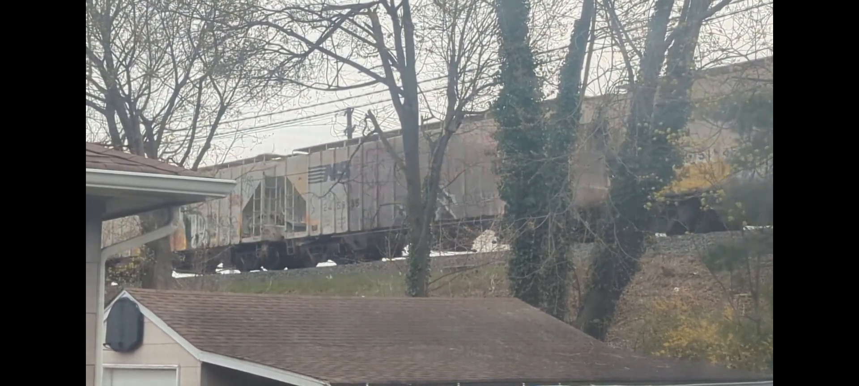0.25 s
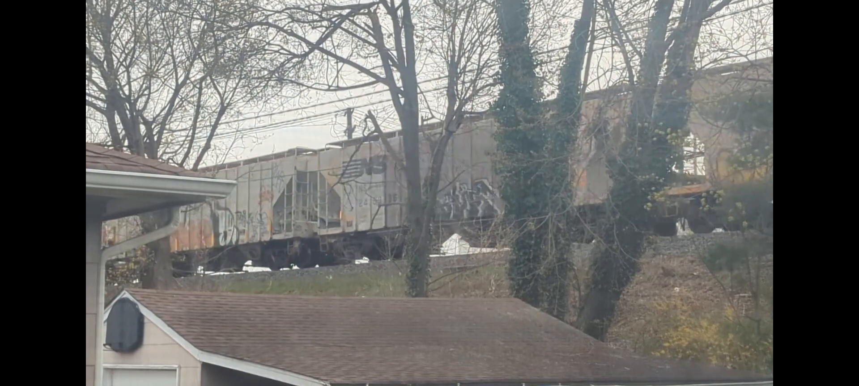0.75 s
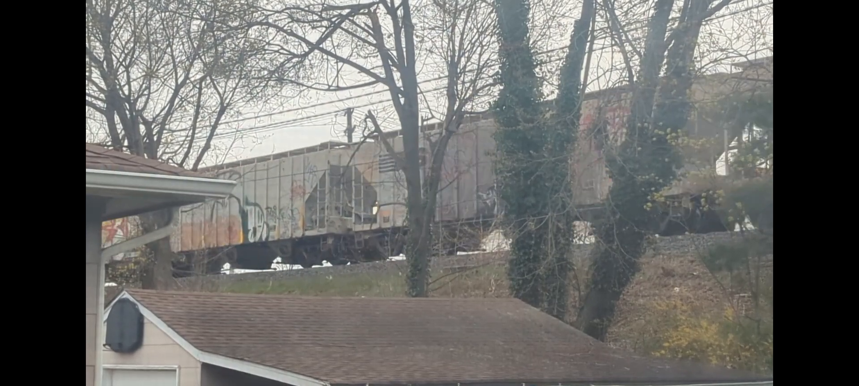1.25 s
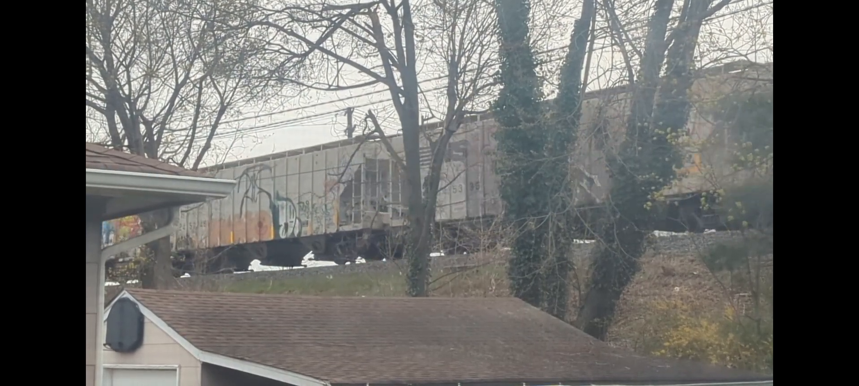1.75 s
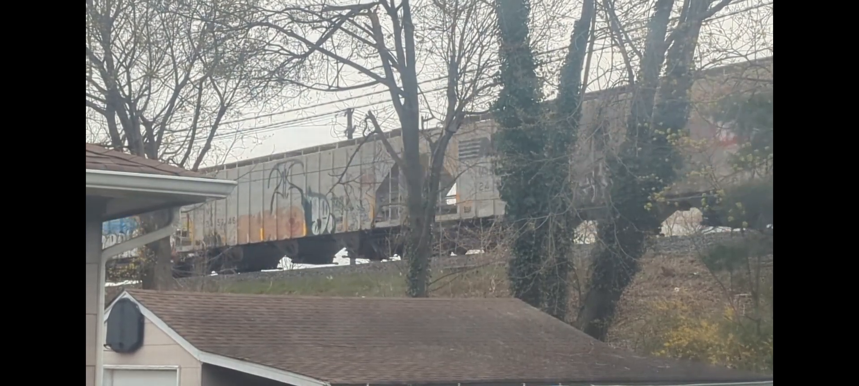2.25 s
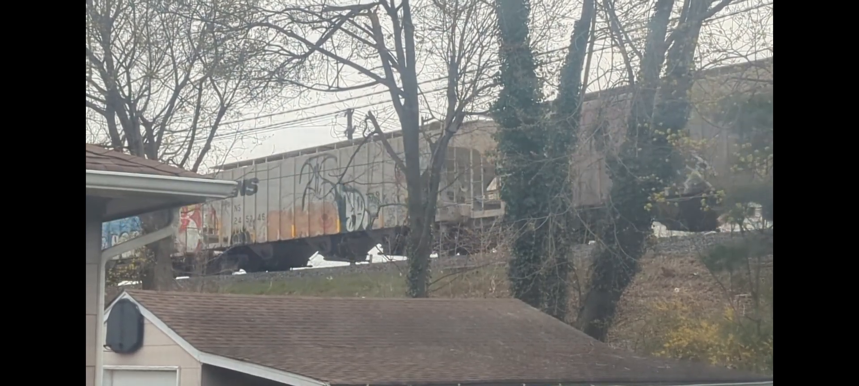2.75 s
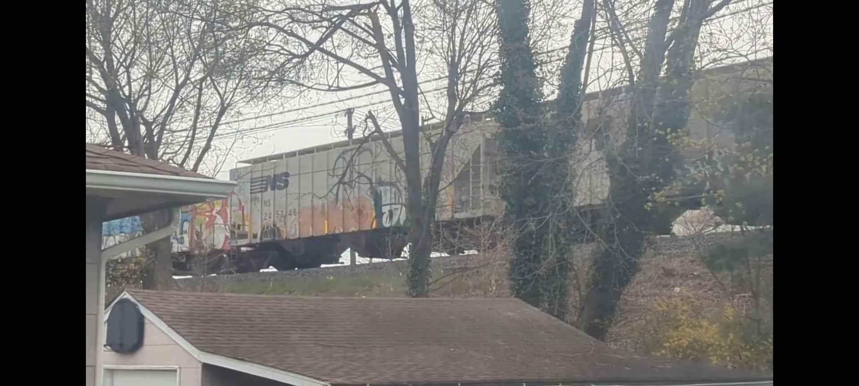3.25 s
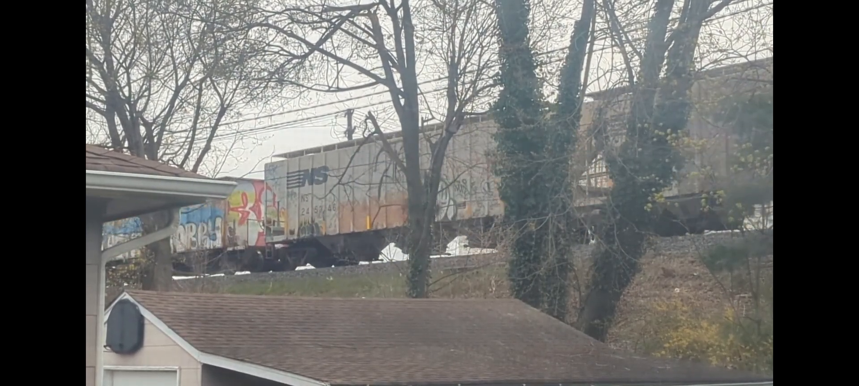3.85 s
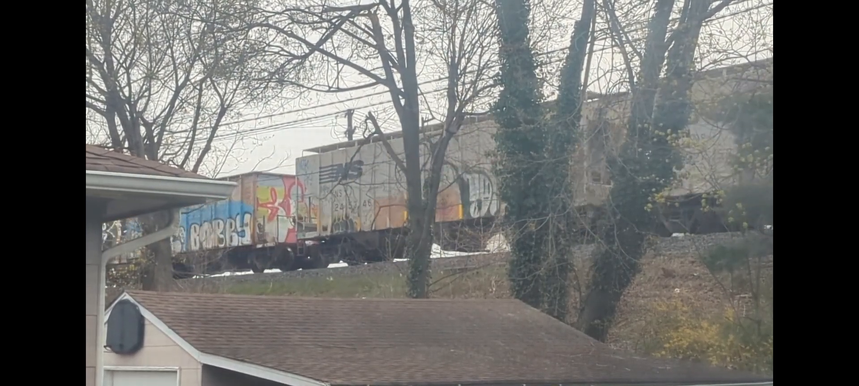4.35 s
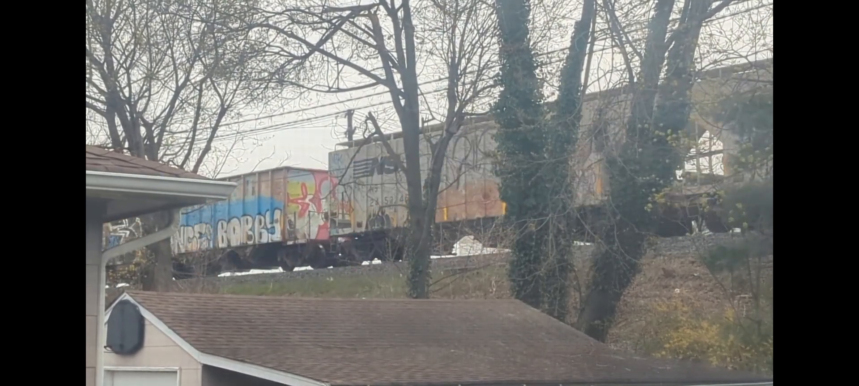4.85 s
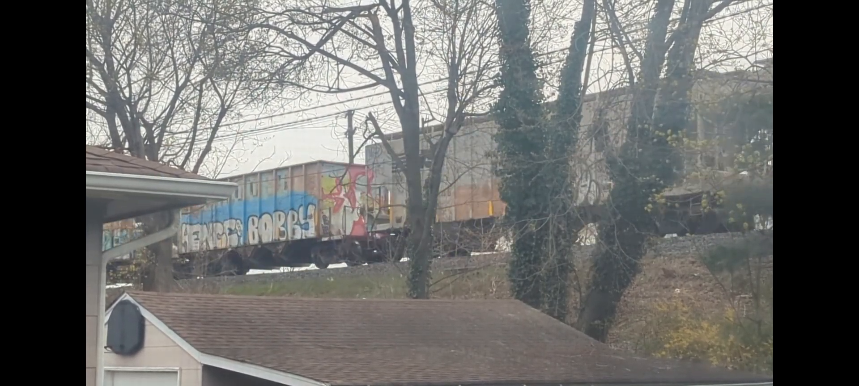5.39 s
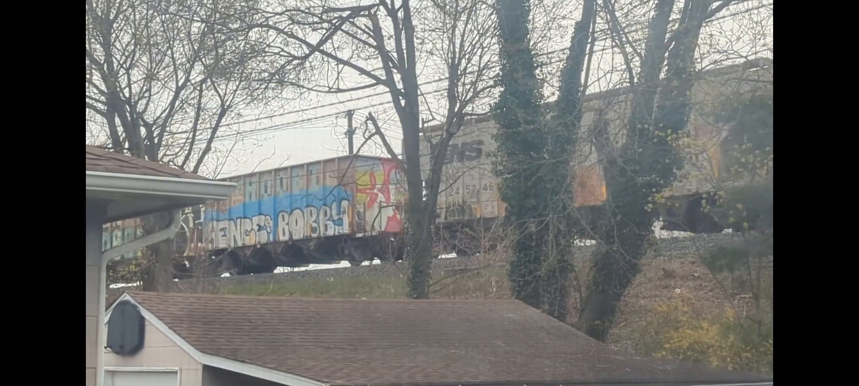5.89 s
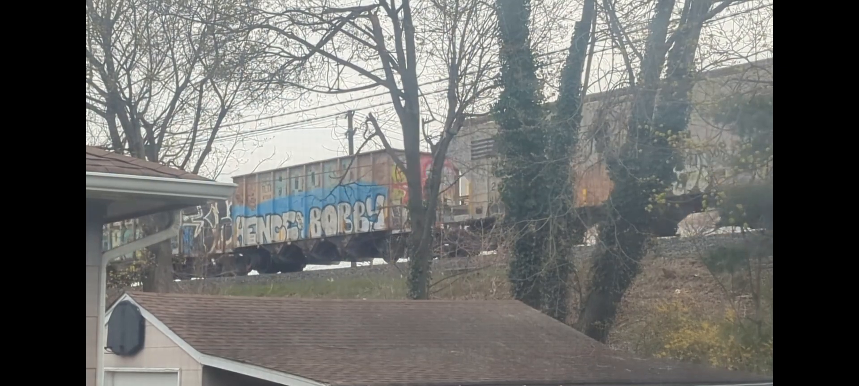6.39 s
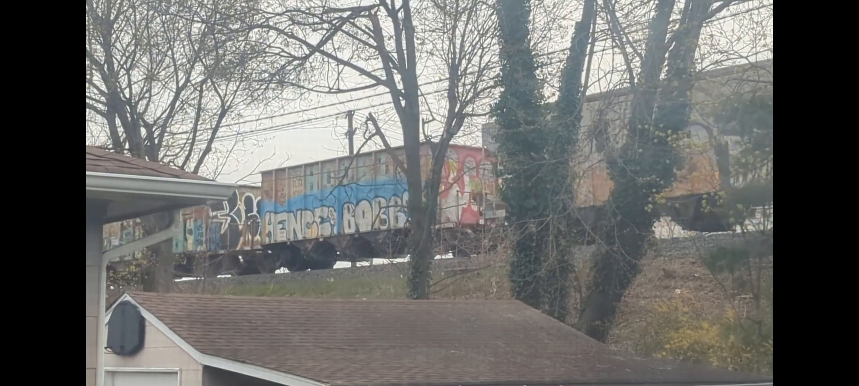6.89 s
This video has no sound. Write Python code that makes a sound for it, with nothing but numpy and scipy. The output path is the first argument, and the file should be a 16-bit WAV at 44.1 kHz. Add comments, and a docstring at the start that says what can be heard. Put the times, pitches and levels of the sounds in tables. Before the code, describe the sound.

A freight train passes a back yard at some distance: continuous low rumble, dull wheel roar, muted ringing of bogies and hollow booming wagon walls. Over it, wind buffets a hand-held stereo microphone in irregular, close low thumps with small snaps and crackle. A short, loud tearing gust bursts just before two seconds; the heaviest thumps cluster between four and five seconds, with another pair near the end.

```python
"""A freight train rolls past a back yard: shaped noise for wheels and wagon bodies, resonances for the ringing
bogies, wandering sines for the booming wagon walls. Wind flicks the hand-held stereo microphone: single eddies
are pressure pulses that thump, with snaps, crackle and soft flurries; one stronger gust is a short tearing blast
of noise. A faint even air hiss and a few very high hiss pulses lie beneath."""
import sys
import numpy as np
from scipy import signal
from scipy.fft import rfft, irfft, next_fast_len
from scipy.io import wavfile

SR = 44100
rng = np.random.default_rng(int(sys.argv[2]) if len(sys.argv) > 2 else 0)


def inscribe(sig):
    """Save sig as 16-bit PCM at rate SR to the path in sys.argv[1].

    A 1-D sig is mono; a 2-D sig holds one channel per row.
    Samples are clipped to [-1, 1] before scaling.
    """
    pcm = np.round(np.clip(np.atleast_2d(sig).T, -1, 1) * 32767)
    wavfile.write(sys.argv[1], SR, pcm.astype(np.int16))


N = 314433
TIME = np.arange(N) / SR   # s

# Rumble of the passing wagons. Each row: time in seconds, level in dB before a common offset.
TRAIN_RUMBLE = [(0.0, -43.5), (0.36, -44), (0.71, -44.5), (1.55, -44), (1.83, -42.5), (3.04, -40),
                (3.22, -40.5), (6.91, -42), (7.13, -42.5)]
# Spectrum of the wagon bodies. Each row: frequency in Hz, relative density in dB.
BODY_COLOUR = [(15, -27.5), (35, -13), (55, 8.5), (90, 3), (115, -2.5), (135, -2.5), (200, -1.5),
               (300, -10.5), (600, -49)]
# Spectrum of wheels and rails. Each row: frequency in Hz, relative density in dB.
WHEEL_COLOUR = [(150, 3), (230, -2.5), (310, -2.5), (400, -8), (580, -13.5), (750, -17.5), (950, -27.5),
                (1850, -26.5), (2300, -32), (3150, -42.5), (3900, -52.5), (6000, -79)]
# Ringing of bogies and wheels. Each row: frequency in Hz, half-width in Hz, level in dB before a common offset.
RINGS = [(184.1, 2, -42.5), (226.5, 4.9, -46), (309.7, 5.4, -48.5), (460.9, 7, -51.5), (502, 17, -59.5),
         (583, 15, -59.5), (678, 15, -63), (970, 100, -82), (1290, 73, -61.5), (1556, 24, -69),
         (1786, 82, -65.5), (2320, 85, -78), (2923, 54, -77.5), (3390, 110, -81)]
# Steady boom of wagon walls. Each row: pitch in Hz, level in dB.
WALL_BOOMS = [(59.2, -47), (86.5, -47)]
# Wall swells when a wagon is jolted. Each row: centre in seconds, 1/e half-length in seconds, pitch in Hz,
# level in dB.
WALL_SWELLS = [(0.09, 0.25, 59.2, -34.5), (0.307, 0.1, 59.6, -35), (0.323, 0.075, 86.5, -38.5),
               (0.64, 0.22, 59.2, -40), (1.698, 0.3, 86.5, -38.5), (2.197, 0.11, 59.2, -36),
               (2.315, 0.1, 86.5, -37), (5.2, 0.14, 86.5, -38), (7.013, 0.12, 59.2, -40.5)]
# Likeness of the two ports in a diffuse field. Each row: frequency in Hz, correlation.
LIKENESS = [(50, 0.33), (100, 0.54), (200, 0.92), (320, 0.82), (520, 0.54), (800, 0.07), (1200, 0.16),
            (3000, .05)]

# Eddies hitting the microphone, ahead of the duct. Each row: time in seconds, dip depth in dB, nominal pitch in Hz,
# turbulence in dB re dip, flutter pitch in Hz, flutter in dB re dip.
EDDIES = [(0.604, -12, 135, -24.5, 340, -20), (0.786, -29, 145, -37, 368, -11),
          (0.8176, -17.5, 125, -33, 371, -6.5), (0.8433, -19.5, 172, -35, 365, -13),
          (1.125, -21, 166, -28, 376, -4.5), (1.1573, -23.5, 210, -36, 370, -13),
          (1.189, -23.5, 195, -42, 367, -18), (1.3558, -21, 177, -31, 360, -12),
          (1.654, -18.5, 135, -44.5, 300, -21), (1.676, -14.5, 145, -49, 350, -22),
          (1.697, -20, 150, -41, 320, -21), (1.809, -12, 163, -32, 365, -14.5),
          (1.844, -14, 300, -16.5, 430, -6), (1.8939, -8.5, 128, -26, 383, -17),
          (1.908, -17, 133, -32, 376, -19), (2.7712, -13, 135, -30, 380, -19),
          (2.8968, -11, 157, -20, 342, -7), (3.226, -4.5, 134, -29.5, 280, -12),
          (3.5556, -22.5, 244, -15, 397, 1), (3.5652, -13.5, 129, -39, 410, -18),
          (3.6132, -10, 129, -22, 400, -9), (3.6112, -11.5, 230, -27, 596, -7),
          (3.8845, -12.5, 151, -38, 371, -22), (3.898, -9.5, 208, -28, 358, 0.5),
          (4.3301, -4, 193, -24, 392, -6.5), (4.426, 1.5, 143.4, -42, 339, -21),
          (4.479, -11.5, 157.4, -19, 400, -5), (4.8286, -5.5, 169, -32, 391, -3),
          (4.9105, -7.5, 193, -17, 360, 3), (4.9227, 0.8, 147.5, -38, 280, -24),
          (4.967, -6.5, 134, -36, 473, -13.5), (5.0323, -19, 181, -37, 410, -11.5),
          (5.4039, -10, 137, -30.5, 311, -33), (5.711, -10, 116, -27, 248, -11),
          (6.6677, -3.5, 176, -28.5, 320, -11), (6.6748, -2.5, 144, -21, 395, -12)]
# Spectrum of the fine turbulence. Each row: frequency in Hz, relative density in dB.
RASP_COLOUR = [(300, -2.5), (520, 19), (830, 2), (1050, 2.5), (1250, -2), (1500, -1), (2100, -20),
               (3000, -34.5), (4500, -59.5), (7000, -76)]
# Smear of each eddy at the right port. Each row: delay in seconds, gain as a factor.
RIGHT_PORT = [(-.0058, -0.26), (-.003, 0.21), (.0008, 0.76), (.0044, .26), (.0093, -0.33)]
# Sharp pressure snaps, ahead of filter and duct. Each row: time in seconds, peak in dB, width as a multiple of
# the unit width.
SNAPS = [(0.6007, -17.5, 7.1), (1.8593, -3, 1.52), (1.8715, -6.5, 2.1), (1.8791, 5.5, 4.4),
         (2.8931, -18.5, 4.8), (3.5536, -24.5, 1.9), (3.612, -23.5, 4.7), (4.3282, -14.5, 5.6),
         (4.3311, -28.5, 3.6), (4.422, -14.5, 7.4), (4.475, -8, 5.5), (4.8262, -18.5, 3.8),
         (4.908, -11, 4.1), (4.918, -21.5, 4), (4.961, -24, 5.5), (6.6714, -20, 3.1), (6.674, -8.5, 7.2)]
# Crackle on the blast and harder eddies, ahead of filters and duct. Each row: centre in seconds,
# spread in seconds, strength in dB.
CRACKLES = [(1.859, 0.00041, -15.5), (1.873, .004, -33), (3.225, 0.0057, -39), (3.555, 0.0023, -41),
            (3.613, 0.0034, -42), (3.893, .005, -47), (4.33, 0.0044, -36.5), (4.428, 0.0024, -38.5),
            (4.483, .005, -42.5), (4.83, 0.0043, -39), (4.91, .004, -39), (4.923, 0.0063, -35),
            (4.936, 0.0045, -40), (5.403, .002, -47), (5.715, 0.0047, -43), (6.671, .005, -33)]
# Spectrum of the blast. Each row: frequency in Hz, relative density in dB.
BLAST_COLOUR = [(40, -34), (130, 2), (400, 4), (700, -6.5), (1400, -9.5), (2200, -30), (3300, -30),
                (4700, -58), (6800, -44.5), (8200, -67.5), (10000, -54), (15000, -92)]
# Flurries of small eddies, ahead of the duct. Each row: centre in seconds, 1/e half-length in seconds, level in dB.
FLURRIES = [(0.091, 0.018, -31.5), (0.821, 0.053, -34.5), (1.125, 0.019, -35.5), (1.195, 0.021, -33.5),
            (1.677, 0.031, -38), (3.078, 0.034, -40.5), (4.94, 0.041, -28), (5.47, 0.11, -40.5),
            (6.987, 0.038, -36.5)]
# Spectrum of the flurries. Each row: frequency in Hz, relative density in dB.
FLURRY_COLOUR = [(40, -27), (130, 13.5), (220, 9), (400, -4.5), (700, -29), (1500, -57), (4000, -80)]
# Pulses of very high hiss. Each row: centre in seconds, 1/e half-length in seconds, level in dB.
SIZZLE = [(1.47, .018, -90), (1.55, .018, -90), (1.62, 0.021, -89), (1.715, 0.038, -88)]
# Spectrum of the even air hiss. Each row: frequency in Hz, relative density in dB.
AIR_COLOUR = [(2000, 0), (4000, 1), (6500, -4), (10000, -11), (15000, -17)]

# roar and hiss: level at the rumble's mean, share of its swing in dB
ROAR_DB, ROAR_FOLLOWS = -47.5, 1
HISS_DB, HISS_FOLLOWS, HISS_FADE_DB_PER_S = -58.5, 0.15, 0.36
BLAST_FULL_S, BLAST_DB = 1.8505, -13   # full strength at the right port
BLAST_ATTACK_S, BLAST_HOLD_S, BLAST_RELEASE_S = 0.005, 0.039, 0.03   # attack and release span 60 dB
BLAST_FINE_HOLD_S, BLAST_FINE_HZ = 0.029, 613   # turbulence above this pitch dies first
BLAST_FRONT_DB, BLAST_FRONT_S = 7.5, 0.0095   # extra bass at the right port, 1/e half-length
AIR_DB = -82.5
FADE_S, CUTOFF_HZ = 0.004, 17000


def from_db(db):
    """Decibels to gain."""
    return 10 ** (np.asarray(db) / 20)


def rms_one(x):
    """Scale to unit power."""
    return x / np.sqrt(np.mean(x ** 2) + 1e-20)


def at_hz(points, hz):
    """Read a curve on a log-frequency axis."""
    point_hz, value = np.transpose(points)
    return np.interp(np.log(hz + 1e-3), np.log(point_hz), value)


def butter(x, hz, kind, order=2):
    """Causal Butterworth filter."""
    return signal.sosfilt(signal.butter(order, hz, kind, fs=SR, output="sos"), x)


def bump(centre_s, length_s):
    """Gaussian rise and fall around one moment."""
    return np.exp(-((TIME - centre_s) / length_s) ** 2)


def drift(rate_hz):
    """Random wander of RMS 1: white noise through two equal poles, computed every 40 samples."""
    step = 40
    pole = np.exp(-2 * np.pi * rate_hz * step / SR)
    white = rng.standard_normal(N // step + 2002)
    slow = signal.lfilter([1], [1, -2 * pole, pole * pole], white)[2000:]   # drop the run-in
    return np.interp(np.arange(N) / step, np.arange(len(slow)), rms_one(slow))


def noise(gain_at, diffuse=True):
    """Stereo noise of a given colour; the ports correlate as in a diffuse field, or not at all."""
    size = next_fast_len(N)
    hz = np.arange(size // 2 + 1) * SR / size
    mid, side = rfft(rng.standard_normal((2, size))) * gain_at(hz)
    alike = at_hz(LIKENESS, hz) * diffuse
    ports = np.sqrt(1 + alike) * mid + np.sqrt(1 - alike) * side * [[1], [-1]]
    return rms_one(irfft(ports, size)[:, :N])


def coloured(points, diffuse=True):
    """Noise that follows a tabled spectrum."""
    return noise(lambda hz: from_db(at_hz(points, hz)), diffuse)


def train():
    """Rough wheels on rough rails shake wagons, bogies and rails; rumble and roar sway together."""
    rumble_db = np.interp(TIME, *np.transpose(TRAIN_RUMBLE))
    load_db = rumble_db - rumble_db.mean()
    roar_db = ROAR_DB + ROAR_FOLLOWS * load_db
    hiss_db = HISS_DB + HISS_FOLLOWS * load_db - HISS_FADE_DB_PER_S * TIME
    sway = drift(7.1)
    flicker_db = 1.5 * drift(14)
    wheels = coloured(WHEEL_COLOUR)

    bodies = rms_one(butter(coloured(BODY_COLOUR), 250, "low", order=4))
    rumble = bodies * from_db(rumble_db + 3.0 + 0.47 * sway)

    roar_band = butter(butter(wheels, 250, "high", order=4), 800, "low", order=4)
    roar = rms_one(roar_band) * from_db(roar_db + 0.43 * sway + flicker_db)

    hiss = rms_one(butter(wheels, 900, "high", order=4)) * from_db(hiss_db + 1.5 * drift(23))
    hiss *= from_db([[1.3], [-1.3]])   # stronger at the left port

    rings = sum(resonance(hz, width_hz) * from_db(db - 4.5) for hz, width_hz, db in RINGS)
    return rumble + walls() + roar + rings + hiss


def resonance(hz, width_hz, glide=0.008, swell_db=2.5):
    """A mode shaken at random by the rough track; pitch and strength wander as wagons come and go."""
    ring = noise(lambda f: 1 / (1 + ((f - hz) / width_hz) ** 2))
    warped = np.abs(TIME + glide * np.cumsum(drift(0.99)) / SR)
    warped = TIME[-1] - np.abs(TIME[-1] - warped)   # folded back at both ends
    gliding = np.array([np.interp(warped, TIME, port) for port in ring])
    return rms_one(gliding * from_db(swell_db * drift(1.8)))


def walls():
    """Hollow wagons boom all along, and louder for a moment when one is jolted."""
    steady = sum(boom(hz) * from_db(db) for hz, db in WALL_BOOMS)
    swells = sum(boom(hz) * from_db(db) * bump(s, length_s) for s, length_s, hz, db in WALL_SWELLS)
    return steady + swells


def boom(hz, wander_rad=2.27, apart_rad=0.36):
    """A lightly damped wall swings near one pitch, its phase wandering a little differently at each port."""
    shared, own, swell = drift(2), np.array([drift(1), drift(1)]), drift(7)
    phase = 2 * np.pi * hz * TIME + wander_rad * shared + apart_rad * own
    return np.sqrt(2) * np.sin(phase) * from_db(1.8 * swell)


def eddies(flutter_s=0.0028, rasp_s=0.0056, tightness=6.3, skew=0.035, scatter_s=0.00097):
    """Each eddy is a dip in pressure between two crests, with finer turbulence on its leading edge."""
    out = np.zeros((2, N))
    rasp = coloured(RASP_COLOUR)[0]
    luck = rng.uniform(-1, 1, (len(EDDIES), 1 + len(RIGHT_PORT)))
    for row, (phase, *strays) in zip(EDDIES, luck):
        s, dip_db, hz, turbulence_db, flutter_hz, flutter_db = row
        near = slice(int((s - 0.04) * SR), int((s + 0.04) * SR))
        t = TIME[near] - s
        turn = 2 * np.pi * hz * t
        turn = turn * (1 - skew * np.tanh(turn / 6))   # a steep front, a slower wake
        pressure = -np.real((1 - 1j * turn / tightness) ** (-tightness - 1))
        # a few small vortices shed at the rim of the port
        flutter = np.sin(2 * np.pi * flutter_hz * t + np.pi * phase)
        pressure += flutter * from_db(flutter_db) * np.exp(-((t + 0.0017) / flutter_s) ** 2)
        pressure += rasp[near] * from_db(turbulence_db) * np.exp(-((t + 0.0014) / rasp_s) ** 2)
        pressure *= from_db(dip_db)
        # clean at the left port, spread over several milliseconds at the right
        out[0, near] += pressure
        for (delay_s, gain), stray in zip(RIGHT_PORT, strays):
            out[1, near] += gain * np.interp(t - delay_s - scatter_s * stray, t, pressure)
    return out


def snaps(unit_width_s=0.00006, low_hz=480, smear_s=0.0081, right_db=-4.5):
    """A steep front cracks at the left port and is smeared into a short rustle at the right."""
    crack = sum(from_db(db) / (1 + ((TIME - s) / (unit_width_s * width)) ** 2) for s, db, width in SNAPS)
    crack = butter(crack, low_hz, "high")
    t = np.arange(-1000, 1001) / SR
    smear = rng.standard_normal(len(t)) * np.exp(-(t / smear_s) ** 2)
    rustle = signal.fftconvolve(crack, smear / np.linalg.norm(smear), "same")
    return np.array([crack, from_db(right_db) * rustle])


def crackles(uneven_db=4.0, low_hz=2400, high_hz=7500, count=16):
    """Clusters of tiny ticks of very uneven size, different at each port."""
    out = np.zeros((2, N))
    luck = rng.standard_normal((len(CRACKLES), 2, 2, count))
    for (s, spread_s, db), ports in zip(CRACKLES, luck):
        for port, (when, size) in zip(out, ports):
            ticks = from_db(uneven_db * size) * (-1) ** np.arange(count)
            index = ((s + spread_s * when) * SR).astype(int)
            port[index] += from_db(db) * ticks / np.linalg.norm(ticks)
    return butter(butter(out, low_hz, "high"), high_hz, "low")


def blast(left_late_s=0.0056, left_body_db=-2.0, ragged_db=2.0, tearing_swing_db=-5.0,
          tearing_hz=2000, tearing_at_s=0.021, tearing_s=0.029):
    """A gust tears across the right port, then the left; its treble splinters and dies before its bass."""
    t = TIME - BLAST_FULL_S - np.array([[left_late_s], [0]])
    # each port meets its own small eddies
    ragged = from_db(ragged_db * np.array([drift(390), drift(190)]))
    rush = coloured(BLAST_COLOUR, diffuse=False)

    splinters = rms_one(from_db(tearing_swing_db * np.array([drift(900), drift(980)])))
    splinters = splinters * bump(BLAST_FULL_S + tearing_at_s, tearing_s)
    treble = splinters * butter(rush, tearing_hz, "high", order=3)
    rush = butter(rush, tearing_hz, "low", order=3) + treble

    # the gust first shoves the right port
    shove = from_db([np.full(N, left_body_db), BLAST_FRONT_DB * bump(BLAST_FULL_S, BLAST_FRONT_S)])
    body = butter(rush, BLAST_FINE_HZ, "low", order=3) * gust(t, BLAST_HOLD_S) * shove
    fine = butter(rush, BLAST_FINE_HZ, "high", order=3) * gust(t, BLAST_FINE_HOLD_S)
    return ragged * (body + fine)


def gust(t, hold_s):
    """Attack, hold and release, even in dB, t seconds after full strength is reached."""
    attack = np.maximum(-t / BLAST_ATTACK_S, 0)
    release = np.maximum((t - hold_s) / BLAST_RELEASE_S, 0)
    return from_db(BLAST_DB) * np.exp(-np.log(1000) * np.minimum(attack + release, 10))


def flurries():
    """Swarms of weak eddies make a soft, lumpy flutter."""
    level = sum(from_db(db) * bump(s, length_s) for s, length_s, db in FLURRIES)
    return level * from_db(1.8 * drift(50)) * coloured(FLURRY_COLOUR)


def duct(x, notch_hz=5000, q=2.9, depth=0.68, leak_hz=42):
    """The narrow duct to the microphone weakens one band of the treble and leaks the deepest bass."""
    notched = signal.lfilter(*signal.iirnotch(notch_hz, q, fs=SR), x)
    weakened = x + depth * (notched - x)
    hz = np.arange(N // 2 + 1) * SR / N
    return irfft(rfft(weakened) * (1 - np.exp(-(hz / leak_hz) ** 4)), N)


def sizzle(hz=9200, half_width_hz=700):
    """A faint, very high band of noise comes in a few pulses."""
    level = sum(from_db(db) * bump(s, length_s) for s, length_s, db in SIZZLE)
    return level * noise(lambda f: 1 / (1 + ((f - hz) / half_width_hz) ** 2), diffuse=False)


def air():
    """Even treble noise, independent at the two ports."""
    return from_db(AIR_DB) * coloured(AIR_COLOUR, diffuse=False)


def scene():
    """The train, the wind at the microphone through its duct, and the faint hisses."""
    wind = eddies() + snaps() + crackles() + blast() + flurries()
    return train() + duct(wind) + sizzle() + air()


def record(dry):
    """Limit the strongest peaks, fade in and out, cut the top."""
    fade = np.minimum(np.minimum(TIME, TIME[-1] - TIME) / FADE_S, 1)
    limited = fade * dry / (1 + dry ** 8) ** (1 / 8)
    return signal.sosfilt(signal.cheby2(12, 60, CUTOFF_HZ, fs=SR, output="sos"), limited)


dry = scene()
out = record(dry)
inscribe(out)
```